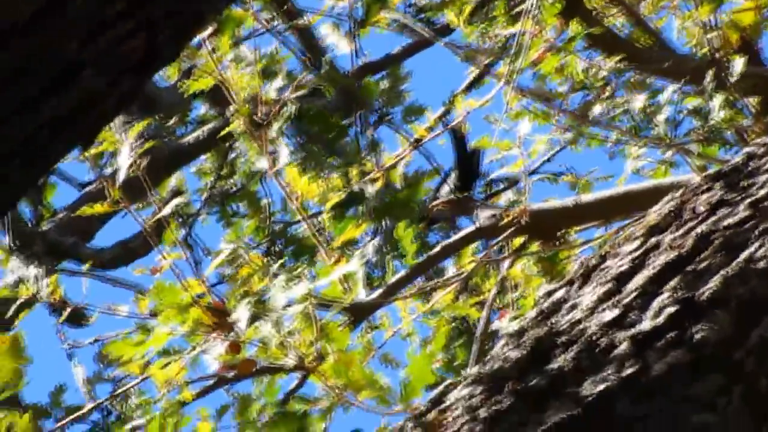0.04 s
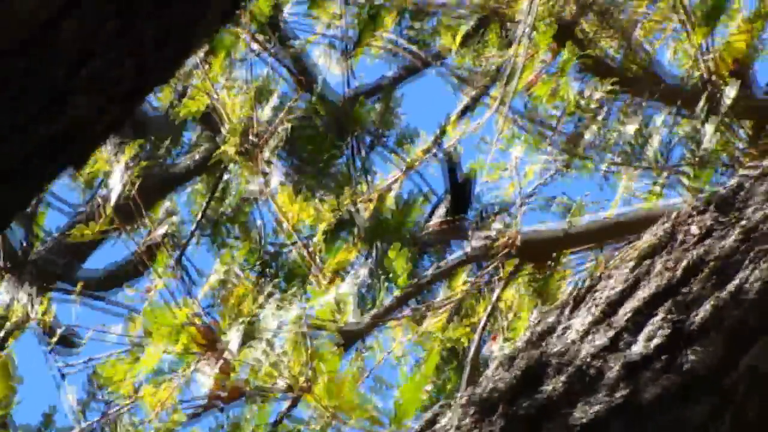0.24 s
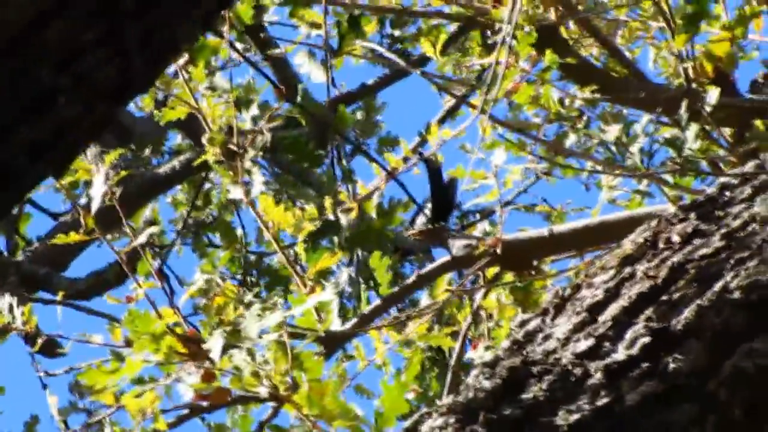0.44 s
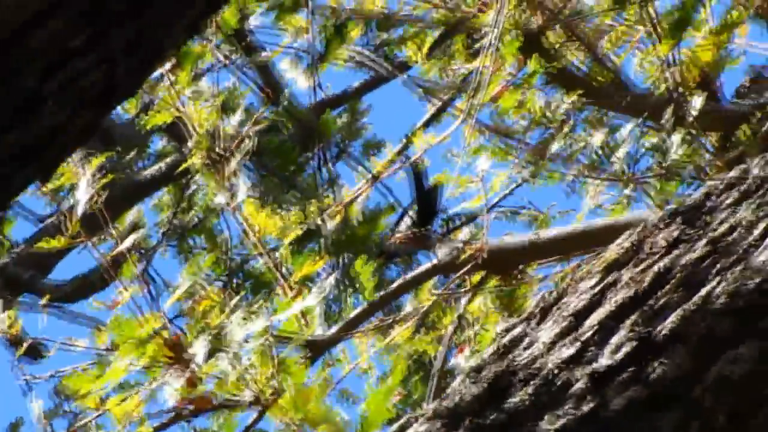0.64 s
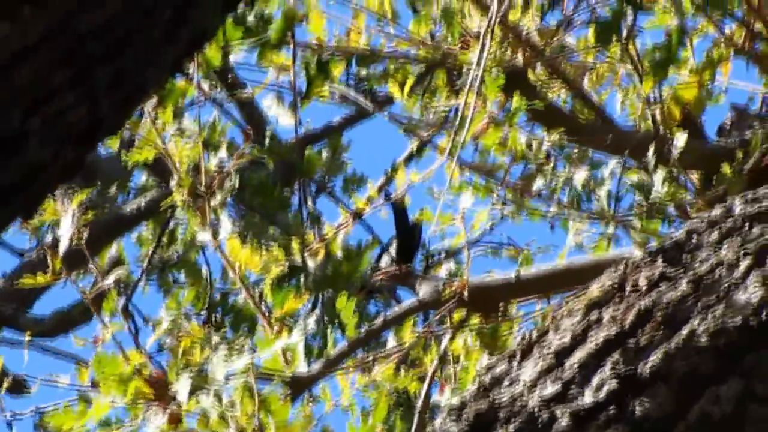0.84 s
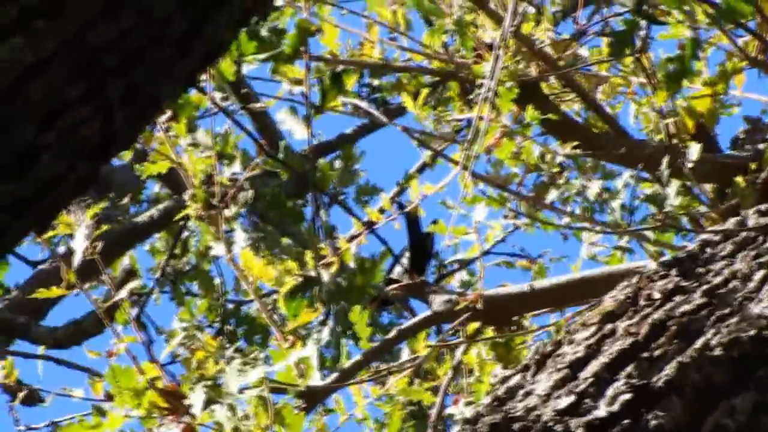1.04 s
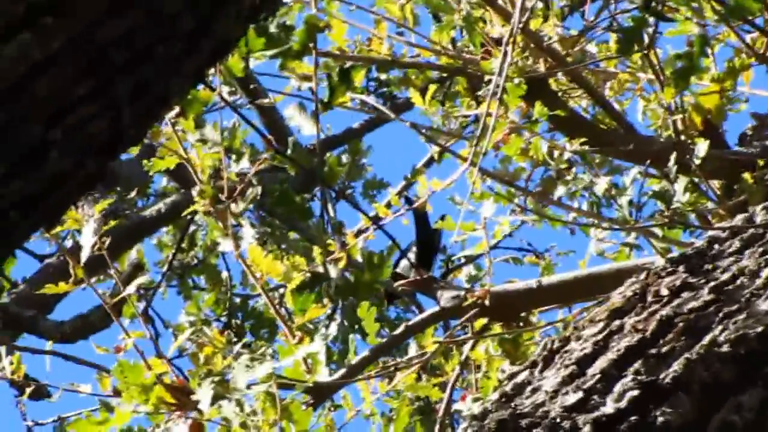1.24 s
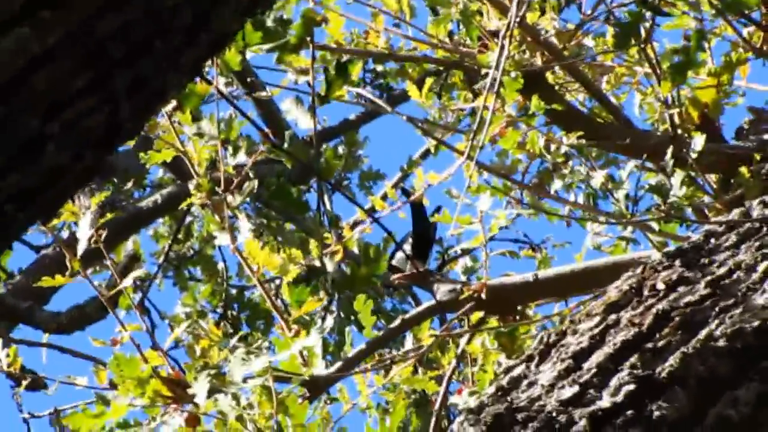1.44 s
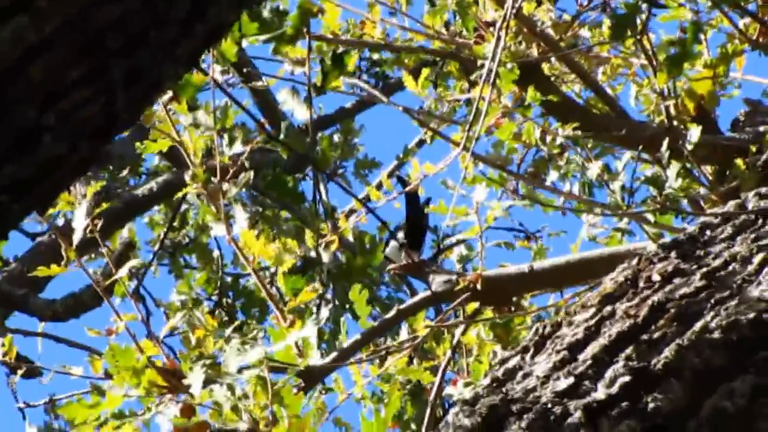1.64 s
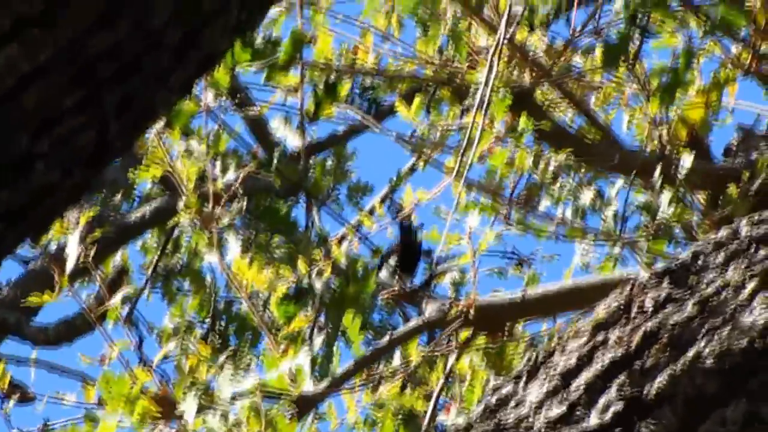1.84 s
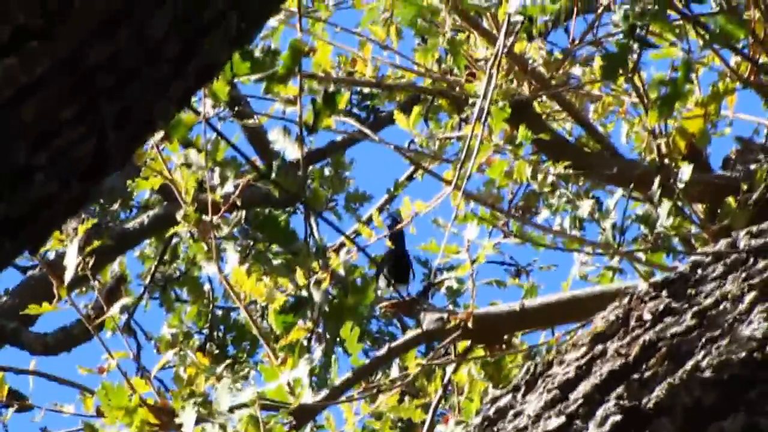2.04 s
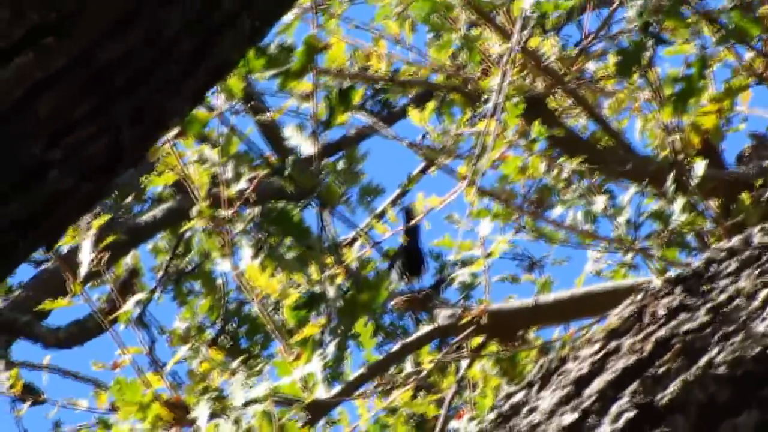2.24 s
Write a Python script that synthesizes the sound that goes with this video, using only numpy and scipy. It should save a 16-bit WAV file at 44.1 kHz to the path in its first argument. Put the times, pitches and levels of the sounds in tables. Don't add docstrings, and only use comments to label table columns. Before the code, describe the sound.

A magpie in a tree overhead gives a quick burst of four harsh, rising rasps with a short woodland echo; a twig snaps just before, then faint far birds whistle over quiet leaf hiss and wind rumble.

```python
import sys
import numpy as np
from scipy import signal
from scipy.fft import rfft, irfft, next_fast_len
from scipy.io import wavfile
from scipy.ndimage import uniform_filter1d, map_coordinates

SR = 44100
rng = np.random.default_rng(int(sys.argv[2]) if len(sys.argv) > 2 else 0)


def bounce(signal):
    frames = np.transpose(np.atleast_2d(signal))
    limited = np.clip(frames, -1, 1)
    pcm = np.round(limited * 32767).astype(np.int16)
    wavfile.write(sys.argv[1], SR, pcm)


def ratio_of_db(decibels):
    return 10 ** (np.asarray(decibels, float) / 20)


N = 101429


def unit(x):
    return x / np.sqrt(np.mean(x ** 2) + 1e-20)


def along(points, hz):
    f, v = np.transpose(points)
    return np.interp(np.log(hz + 1), np.log(f + 1), v)


def wobble(rate, size=N):
    knots = rng.standard_normal(int(size * rate / SR) + 4)
    return map_coordinates(knots, [np.arange(size) * rate / SR])


def filtered(x, response):
    n = x.shape[-1]
    m = next_fast_len(n + 8192)
    return irfft(rfft(x, m) * response(np.fft.rfftfreq(m, 1 / SR)), m)[..., :n]


def peak(f, hz, width):
    return 1j * f * width / (hz * hz - f * f + 1j * f * width)


def add(track, s, x):
    part = track[..., round(s * SR):][..., :x.shape[-1]]
    part += x[..., :part.shape[-1]]


def rush(spectrum, alike, patchy_db):
    z = signal.stft(rng.standard_normal((2, N)), nperseg=512)[2]
    field = uniform_filter1d(rng.standard_normal(z.shape[1:]), 6, 0)
    field = uniform_filter1d(field, 14, 1)
    pair = signal.istft(z * ratio_of_db(patchy_db * unit(field)), nperseg=512)[1][:, :N]
    closed = [(spectrum[0][0] / 2, -120)] + list(spectrum) + [(spectrum[-1][0] * 2, -120)]

    def mid_side(hz):
        turn = np.arccos(np.clip(along(alike, hz), -1, 1)) / 2
        return ratio_of_db(along(closed, hz)) * [np.cos(turn), np.sin(turn)]

    mid, side = filtered(pair, mid_side)
    return unit(np.array([mid + side, mid - side]))


FLOOR_PAN_DB = 0.36


def to_floor(pair):
    return pair * ratio_of_db([[FLOOR_PAN_DB / 2], [-FLOOR_PAN_DB / 2]])


# hz, density_db (dB per Hz)
HUM_SPECTRUM = [(45, 1), (65, 3), (90, -3.5), (107, 8.5), (122, -15), (160, -31)]
HUM_DB = -50.5


def traffic():
    level_db = HUM_DB + 0.4 * wobble(5.36)
    return to_floor(ratio_of_db(level_db) * rush(HUM_SPECTRUM, [(100, 0.81)], patchy_db=-1.3))


# hz, density_db (dB per Hz)
LEAF_SPECTRUM = [(76, -12), (130, -3.5), (169, -11), (247, -8), (499, -12.5), (1310, -12), (1770, -15),
                 (2440, -15.5), (15800, -40)]
# hz, likeness (0 to 1)
LEAF_LIKENESS = [(60, 0.89), (240, 0.56), (950, 0.61), (3770, 0.063), (15000, 0.014)]
LEAVES_DB = -49.5


def leaves():
    level_db = LEAVES_DB + 0.2 * wobble(7.3)
    return to_floor(ratio_of_db(level_db) * rush(LEAF_SPECTRUM, LEAF_LIKENESS, patchy_db=1.55))


# time_s, level_db
WIND_STRENGTH = [(0.0, -38), (0.04, -44), (0.15, -58), (0.18, -41.5), (0.7, -57), (1.7, -62.5), (1.85, -42),
                 (1.88, -44), (2.06, -43), (2.3, -48.5)]
# hz, density_db (dB per Hz)
RUMBLE_SPECTRUM = [(15, -31), (30, 7), (50, -9), (90, -4.5), (160, -76)]
GUST_DB = 3


def wind():
    strength_db = np.interp(np.arange(N) / SR, *np.transpose(WIND_STRENGTH))
    gusts = ratio_of_db(GUST_DB * np.array([wobble(8.07), wobble(8.8)]))
    rumble = rush(RUMBLE_SPECTRUM, [(30, .05)], patchy_db=3.3)
    return ratio_of_db(strength_db + 6.5) * unit(gusts * rumble)


# hz, t60_s
TRUNK_DECAY = [(1500, 0.66), (3000, 0.35), (5000, 0.5), (7000, 0.29), (10000, 0.28)]
FAR_DB, FAR_LONGER = -9, 2.2
ECHO_ALIKE = .42


def trunks(x):
    common, left, right = rng.standard_normal((3, SR // 2))
    noise = np.sqrt(ECHO_ALIKE) * common + np.sqrt(1 - ECHO_ALIKE) * np.array([left, right])
    hz, t, z = signal.stft(noise, SR, nperseg=256)
    fade_db = -60 * t / along(TRUNK_DECAY, hz)[:, None]
    fade = np.hypot(ratio_of_db(fade_db), ratio_of_db(FAR_DB + fade_db / FAR_LONGER))
    tail = signal.istft(z * fade, SR, nperseg=256)[1]
    return signal.fftconvolve(x[None], tail / np.linalg.norm(tail[0]), axes=1)


# start_s, length_s, from_hz, to_hz, level_db
FAR_WHISTLES = [(.068, .014, 3150, 3200, -58), (.07, .11, 9000, 9150, -72), (.178, .018, 4250, 4250, -63),
                (.48, .03, 11100, 11100, -73), (.485, .045, 3450, 3650, -61), (1.43, .19, 8500, 8700, -79),
                (1.47, .03, 2350, 2400, -61), (1.495, .04, 2750, 3050, -60), (1.565, .035, 2400, 2450, -61),
                (1.575, .03, 3950, 4000, -63), (1.59, .03, 7950, 7950, -73), (1.83, .18, 4200, 3600, -62),
                (1.95, .12, 5350, 4250, -66), (2.05, .07, 3550, 3300, -64), (2.16, .2, 3200, 2600, -65),
                (2.175, .22, 10250, 10130, -64), (2.22, .14, 14050, 14050, -78),
                (2.23, .12, 7700, 7700, -75)]
WHISTLE_DB, WHISTLE_FLUTTER_DB, WHISTLE_BLUR_DB = 3, 1.5, -5
WHISTLE_WAVER, WHISTLE_SWELL = .004, .7


def far_whistles():
    out = np.zeros((2, N))
    for s, length, hz0, hz1, db in FAR_WHISTLES:
        u = np.arange(round(length * SR)) / (length * SR)
        hz = (hz0 + (hz1 - hz0) * u) * (1 + WHISTLE_WAVER * wobble(168, size=len(u)))
        gain = ratio_of_db(db + WHISTLE_DB + WHISTLE_FLUTTER_DB * wobble(53, size=len(u)))
        swell = np.sin(np.pi * u) ** WHISTLE_SWELL
        tone = np.sin(2 * np.pi * np.cumsum(hz) / SR) * swell * gain
        add(out, s, tone + ratio_of_db(WHISTLE_BLUR_DB) * trunks(tone)[:, :len(u)])
    return out


# start_s, length_s, centre_hz, width_hz, level_db
FAR_CHURRS = [(.165, .07, 2400, 700, -56), (1.87, .08, 2550, 500, -58), (1.9, .1, 7000, 2500, -64),
              (1.91, .085, 5350, 900, -55), (2.058, .012, 11000, 1500, -66)]


def far_churrs():
    out = np.zeros((2, N))
    for s, length, hz, width, db in FAR_CHURRS:
        n = round(length * SR)
        noise = rng.standard_normal((2, n))
        burst = unit(filtered(noise, lambda f: peak(f, hz, width) ** 2))
        add(out, s, ratio_of_db(db) * np.hanning(n) * burst)
    return out


# start_s, peak_db
TWIG_TAPS = [
    (.3627, -46),
    (.366, -46.5),
    (0.3693, -52),
    (0.3729, -28.5),
]
# mode_hz, level_db, t60_s
TWIG_MODES = [(513, -9, 0.019), (756, 5.5, 0.018), (1270, -7.5, 0.028), (1900, -9, 0.014)]
SNAP_DB, SNAP_T60, SNAP_HZ, SNAP_WIDE_HZ = 0.5, 0.0034, 3240, 5000
RING_AFTER_S, TAP_PAN_DB = .0004, 10.5


def twig():
    out, t = np.zeros(N), np.arange(SR // 20) / SR
    for s, db in TWIG_TAPS:
        noise = rng.standard_normal(len(t))
        snap = unit(filtered(noise, lambda f: peak(f, SNAP_HZ, SNAP_WIDE_HZ) ** 2))
        add(out, s, ratio_of_db(db + SNAP_DB - 60 * t / SNAP_T60) * snap)
    ring = sum(ratio_of_db(level - 60 * t / t60) * np.sin(2 * np.pi * hz * t) for hz, level, t60 in TWIG_MODES)
    last_s, last_db = TWIG_TAPS[-1]
    add(out, last_s + RING_AFTER_S, ratio_of_db(last_db) * ring * (1 - np.exp(-t / 0.00042)))
    return out * ratio_of_db([[TAP_PAN_DB / 2], [-TAP_PAN_DB / 2]])


# closed_hz, open_hz, width_hz, closed_db, open_db
THROAT_MODES = [(1450, 2050, 550, -7, -13), (1750, 2950, 420, -2, -1), (2650, 2700, 420, -3.5, -2),
                (4450, 5150, 520, -13, -1.5), (4300, 4200, 600, -24, -11), (5650, 6000, 950, -9, -14),
                (8200, 8700, 600, -27, -12), (11500, 11500, 3000, -42, -36)]
THROAT_LOW_HZ, THROAT_HIGH_HZ = 1180, 9160


def throat(f, opening):
    power = 0
    for hz0, hz1, width, db0, db1 in THROAT_MODES:
        mode = peak(f, hz0 + (hz1 - hz0) * opening, width)
        power = power + abs(ratio_of_db(db0 + (db1 - db0) * opening) * mode) ** 2.44
    return np.sqrt(power / (1 + (THROAT_LOW_HZ / (f + 1)) ** 8) / (1 + (f / THROAT_HIGH_HZ) ** 5))


JITTER_ROUGH, JITTER_CLEAR = .032, .012
NOISE_ROUGH, NOISE_CLEAR = .34, .13
SHIMMER_DB, DRIFT_RAD, FLUTTER_DB = 3, .6, 1
GLIDE_BEND, END_RATE, TOP_AFTER_S = 1.45, .92, .008
SHUT_HZ, OPEN_HZ = 400, 735
ONSET_S, SURGE_S, STOP_S = 0.017, 0.0094, 0.0017
ONSET_DB, BUILD_DB, SURGE_DB, AFTER_DB, FALL_DB = -16, -9.5, -2.5, -4, -8


def rasp(start, loud, end, low_hz, top_hz, db):
    rise, full = loud - start, end - start
    size = 6000
    t = np.arange(size) / SR
    top_s = rise + TOP_AFTER_S
    climb = low_hz + (top_hz - low_hz) * (t / top_s) ** GLIDE_BEND
    pitch = np.where(t < top_s, climb, top_hz * np.interp(t, [top_s, full], [1, END_RATE]))
    opening = np.clip((pitch - SHUT_HZ) / (OPEN_HZ - SHUT_HZ), 0, 1)
    clear = np.interp(t, [rise - .035, rise - .008, top_s, full], [0.022, 0.84, 0.73, 0.0])

    jitter = JITTER_ROUGH + (JITTER_CLEAR - JITTER_ROUGH) * clear
    rate = pitch * (1 + jitter * wobble(501.6, size=size))
    phase = 2 * np.pi * np.cumsum(rate) / SR
    k = np.arange(1, 30)[:, None]
    waver = np.array([[wobble(264, size=size), wobble(205.4, size=size)] for _ in k])
    tones = np.cos(k * phase + 2 * np.pi * rng.random(k.shape) + DRIFT_RAD * waver[:, 0])
    tones = tones * ratio_of_db(SHIMMER_DB * waver[:, 1]) * (k * rate < SR / 2)
    voiced = unit((tones * throat(k * pitch, opening)).sum(0))

    puffs = rng.standard_normal(size) * (1 + 0.3 * np.cos(phase))
    steps = np.linspace(0, 1, 9)
    breath = np.zeros(size)
    for u in steps:
        near = np.clip(1 - abs(opening - u) / steps[1], 0, 1)
        breath += filtered(puffs * near, lambda f: throat(f, u))
    share = NOISE_ROUGH + (NOISE_CLEAR - NOISE_ROUGH) * clear
    mix = np.sqrt(1 - share) * voiced + np.sqrt(share) * unit(breath)

    effort_db = np.interp(t, [0, ONSET_S, rise - SURGE_S, rise, rise + SURGE_S, full, full + STOP_S],
                          [ONSET_DB, BUILD_DB, SURGE_DB, 0, AFTER_DB, FALL_DB, -50])
    gain = ratio_of_db(db + 1.5 + effort_db + FLUTTER_DB * wobble(176, size=size))
    return gain * np.clip(t / 0.0066, 0, 1) * (t < full + STOP_S) * mix


# start_s, loudest_s, end_s, first_pulse_hz, top_pulse_hz
CALLS = [
    (.528, .588, .601, 430, 685),
    (.648, .713, .741, 440, 725),
    (.792, .864, .890, 465, 735),
    (.956, 1.035, 1.059, 395, 730),
]
CALL_LEVELS = [-26.5, -24, -24.5, -25.5]
# hz, left_over_right_db
CALL_PAN = [(1500, 0), (2700, -2.7), (4500, 9), (6500, 6.5), (10000, 1.5)]
# hz, left_lead_rad
CALL_LEAD = [(1000, 0.16), (2600, -0.71), (5000, -0.76), (9000, 0.81)]
ECHO_DB, ECHO_DELAY_S = -8, .006


def magpie():
    out = np.zeros((2, N))
    side = np.array([[1], [-1]]) / 2

    def to_ears(f):
        return ratio_of_db(side * along(CALL_PAN, f)) * np.exp(1j * side * along(CALL_LEAD, f))

    for call, db in zip(CALLS, CALL_LEVELS):
        voice = rasp(*call, db)
        add(out, call[0], filtered(voice, to_ears))
        add(out, call[0] + ECHO_DELAY_S, ratio_of_db(ECHO_DB) * trunks(voice))
    return out


def scene():
    birds = magpie() + far_whistles() + far_churrs()
    return birds + twig() + leaves() + traffic() + wind()


def top_cut(x):
    return signal.sosfilt(signal.butter(12, 16320, fs=SR, output="sos"), x)


TOP_HZ = 15300


def record(dry):
    mix = filtered(dry, lambda f: 1 / np.sqrt(1 + (f / TOP_HZ) ** 30))
    return top_cut(mix)


dry = scene()
out = record(dry)
bounce(out)
```